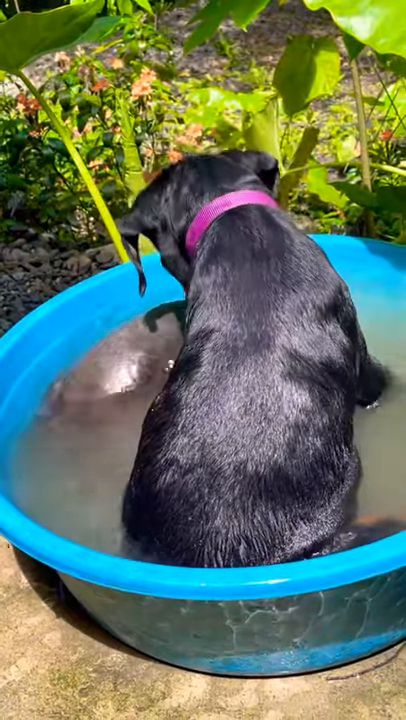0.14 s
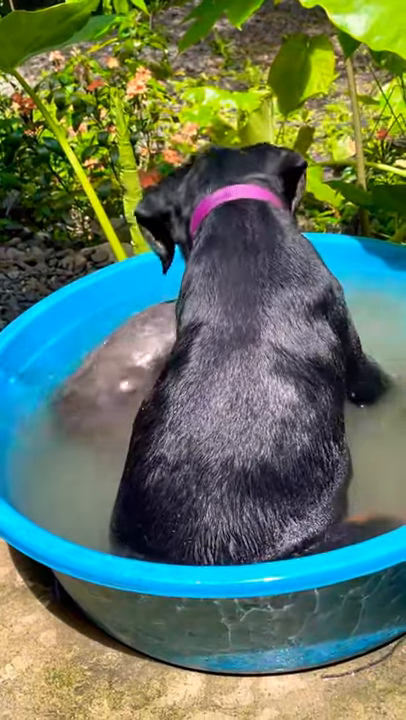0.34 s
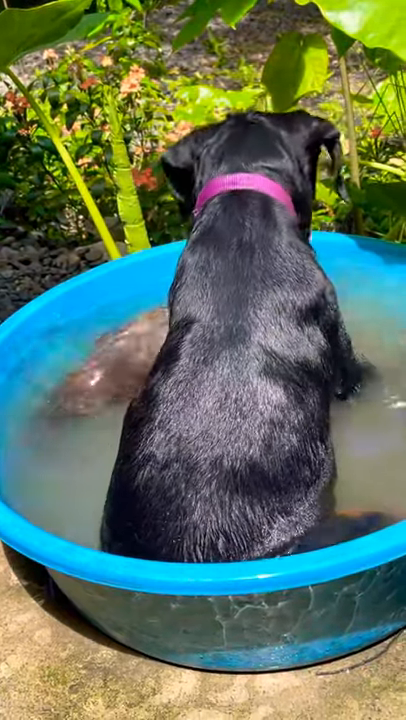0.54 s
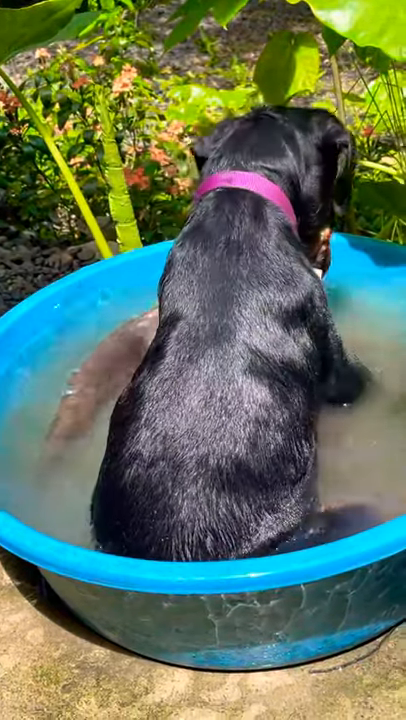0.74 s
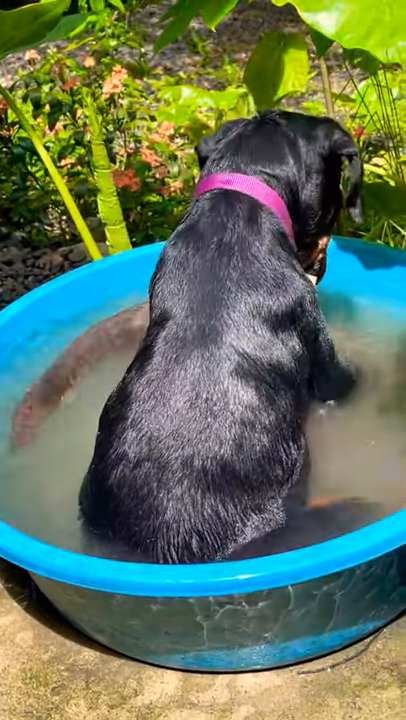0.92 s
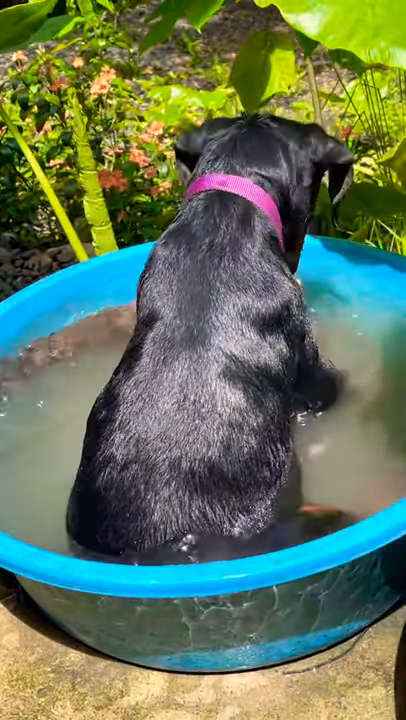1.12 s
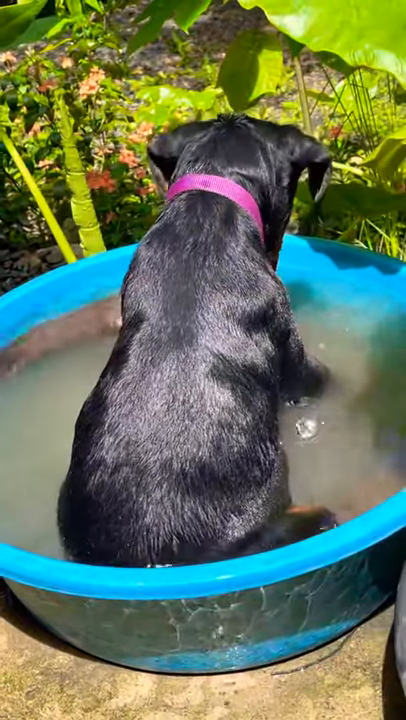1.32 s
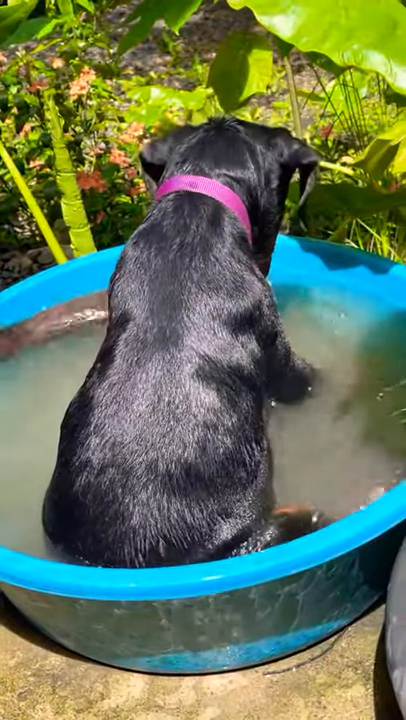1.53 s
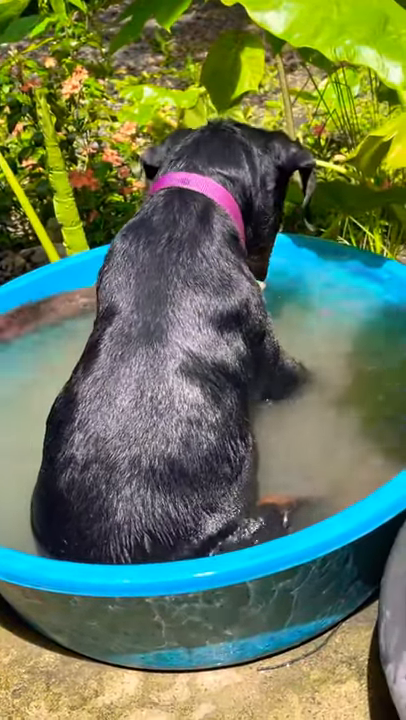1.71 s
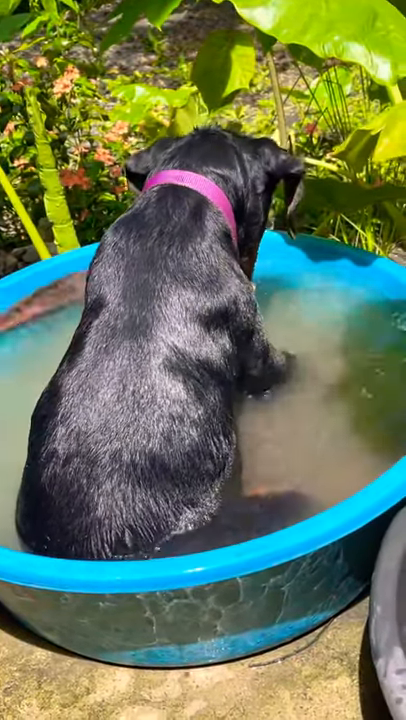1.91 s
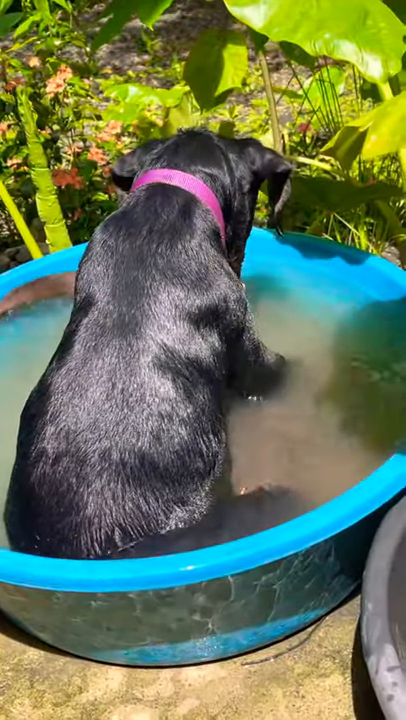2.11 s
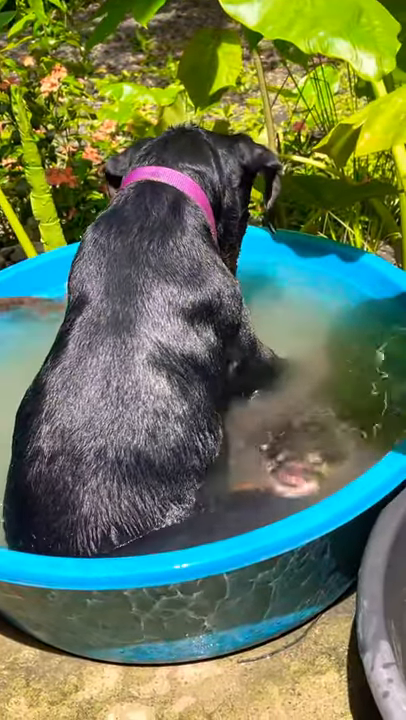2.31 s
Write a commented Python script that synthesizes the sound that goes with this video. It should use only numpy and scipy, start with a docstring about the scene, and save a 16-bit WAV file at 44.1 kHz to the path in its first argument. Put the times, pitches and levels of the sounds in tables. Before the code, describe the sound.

After a brief bright hiss and drops, an otter squeals loudly, pauses while water softly bubbles, then squeals again a little shorter; both cries drop in pitch and turn harsh, in a quiet garden, closely picked up in stereo.

```python
"""A bright hiss and a few drops open the scene and die away over a quiet outdoor hush.
At about 0.2 s an otter squeals from a plastic tub of water in a garden: a thin three-partial whistle
sags, then breaks to a lower, harsh register of many partials and rasp that slides down.
Water gurgles (gliding tones) and drips (short noise bursts); a breathy burst leads into a second squeal
at about 1.6 s. Tub and garden echo it all in part; two closely spaced microphones pick it up."""
import sys
import numpy as np
from scipy import signal
from scipy.fft import rfft, irfft
from scipy.io import wavfile

SR = 44100
rng = np.random.default_rng(int(sys.argv[2]) if len(sys.argv) > 2 else 0)


def waveform_to_disk(signal):
    """Save audio, clipped to [-1, 1], as 16-bit WAV at the path in sys.argv[1]."""
    frames = np.transpose(np.atleast_2d(signal))
    scaled = np.clip(frames, -1, 1) * 32767
    samples = np.round(scaled).astype(np.int16)
    wavfile.write(sys.argv[1], SR, samples)


N = 103635  # length in samples, about 2.35 s


def undb(db):
    """Turn decibels into a gain, where 20 dB is ten times the amplitude."""
    return 10 ** (np.asarray(db) / 20)


def unit(x):
    """Scale a sound to an rms (average strength) of 1."""
    return x / np.sqrt(np.mean(x ** 2) + 1e-30)


def lookup(table, hz):
    """Read a table between its rows, with frequency on a logarithmic axis as in hearing."""
    table_hz, values = np.array(table, float).T
    return np.interp(np.log(np.maximum(hz, 1)), np.log(np.sort(table_hz)), values)


def colour(x, table):
    """Make each frequency of a sound louder or softer by the table's decibels."""
    return irfft(rfft(x) * undb(lookup(table, np.fft.rfftfreq(N, 1 / SR))), N)


def noise(spectrum):
    """Random noise with the given balance of frequencies, rms 1."""
    return unit(colour(rng.standard_normal(N), spectrum))


def wander(hz):
    """Smooth random motion up to about this rate, centred on 0 with spread 1."""
    f = np.fft.rfftfreq(N, 1 / SR)
    keep_slow = np.exp(-.5 * (f / hz) ** 2) * (f > 0)
    return unit(irfft(rfft(rng.standard_normal(N)) * keep_slow, N))


def add(out, start_s, sound):
    """Mix a short sound into a longer one from the given time on."""
    i = int(np.clip(start_s * SR, 0, N - 1))
    out[i:i + len(sound)] += sound[:N - i]


# frequency balance of the outdoor hush: pitch_hz [Hz], level_db [dB per Hz, relative]
HUSH_SPECTRUM = [(25, -70), (42, -9), (58, -0.5), (85, -3.5), (130, -2.5), (220, -6.5), (350, -3.5),
                 (600, -11), (1000, -9), (1550, -5), (2100, -13), (3500, -12), (6200, -17), (7400, -12),
                 (8200, -19), (9400, -15.5), (10200, -5), (11300, -8), (12200, -30.5), (14000, -49)]
# slow rise and fall of the low part of the hush: time_s [s], level_db [dB]
LOW_HUSH_LEVEL = [(0, -1), (.35, -8.5), (.55, 5.5), (.9, -2.5), (1.25, 4), (1.6, -5), (1.95, 0),
                  (2.33, 6.5)]
HUSH_DB, LOW_HUSH_HZ = -60, 503  # level before the low part moves; where the low part ends


def hush(t):
    """Outdoor background: steady noise whose low part slowly swells and sinks."""
    air = undb(HUSH_DB) * noise(HUSH_SPECTRUM)
    low = signal.sosfiltfilt(signal.butter(2, LOW_HUSH_HZ, fs=SR, output="sos"), air)
    time_s, level_db = np.array(LOW_HUSH_LEVEL).T
    return air - low + low * undb(np.interp(t, time_s, level_db))


# share of the hush that differs between the microphones: pitch_hz [Hz], level_db [dB]
HUSH_DIFFERENCE = [(60, -24), (200, -17), (550, -3.5), (1000, -1), (1600, -22), (3000, -25), (11000, -22)]


def hush_difference(t):
    """A separate hush, added to one microphone and subtracted from the other, which widens it."""
    return colour(hush(t), HUSH_DIFFERENCE)


# colour of the garden echo: pitch_hz [Hz], level_db [dB]
GARDEN_COLOUR = [(500, 7), (1500, -11.5), (2050, 8), (2350, -1.5), (3400, -0.5), (4100, 2.5), (4800, 2.5),
                 (7000, 2.5), (9000, -5.5), (11200, 0), (12100, -28), (13000, -42)]
# time for the low and high noise to fall by 60 dB; level; middle of the fade-in
ECHO_T60_S, ECHO_TREBLE_T60_S, ECHO_DB, ECHO_START_S = 0.63, 0.43, -4.5, 0.0045


def garden(x, t):
    """Diffuse echo of walls and plants: a fading noise tail whose treble dies a little sooner."""
    low_filter = signal.butter(2, 5000, fs=SR, output="sos")
    high_filter = signal.butter(2, 5000, "high", fs=SR, output="sos")
    low = signal.sosfilt(low_filter, rng.standard_normal(N))
    high = signal.sosfilt(high_filter, rng.standard_normal(N))
    tail = low * np.exp(-np.log(1000) * t / ECHO_T60_S)
    tail = tail + high * np.exp(-np.log(1000) * t / ECHO_TREBLE_T60_S)
    tail = tail * np.clip(t / ECHO_START_S - .5, 0, 1)
    tail = colour(unit(tail) / np.sqrt(N), GARDEN_COLOUR)
    return undb(ECHO_DB) * signal.fftconvolve(x, tail[:N // 2])[:N]


TUB_DB, TUB_DECAY_S = -8, .007


def tub(x, t):
    """Quick reflections between the water and the tub wall: a very short noise echo."""
    early = rng.standard_normal(N) * np.exp(-t / TUB_DECAY_S)
    return x + undb(TUB_DB) * signal.fftconvolve(x, unit(early) / np.sqrt(N))[:N]


# turbulent rasp of the voice, also the opening hiss: pitch_hz [Hz], level_db [dB per Hz, relative]
RASP_SPECTRUM = [(1400, -46), (2100, -26), (2500, -8), (3500, -11), (5000, 2.5), (7000, -5), (9300, 1),
                 (11000, 6.5), (12000, -13), (13000, -67)]
OPENING_DB, OPENING_DECAY_S = -47.5, 0.033


def opening_hiss(t):
    """A bright noise that dies away at the start."""
    return undb(OPENING_DB) * np.exp(-t / OPENING_DECAY_S) * noise(RASP_SPECTRUM)


# drops and small splashes, and at 1.549 s the breathy onset of the second squeal:
# start_s [s], level_db [dB], centre_hz [Hz], width_octaves [octaves to each side], decay_s [s]
BURST_EVENTS = [(.003, -40.5, 3210, 0.16, 0.011), (.087, -44.5, 6100, 0.41, 0.0055),
                (.088, -37.5, 9630, 0.15, 0.0056), (.99, -31, 9590, 0.36, 0.0017),
                (1.181, -51.5, 5400, 0.14, .005), (1.497, -55.5, 6350, .4, .003),
                (1.549, -50, 4400, 0.8, 0.032), (1.558, -43.5, 2320, 0.082, 0.0091),
                (2.159, -44, 10300, 0.15, 0.0073), (2.222, -57, 7000, .3, 0.0056)]


def drops_and_breath(t):
    """Drops, small splashes and one breathy onset: short noise bursts, each kept to its own band."""
    out = np.zeros(N)
    for start_s, level_db, centre_hz, width_octaves, decay_s in BURST_EVENTS:
        edges = [centre_hz * 2 ** -width_octaves, centre_hz * 2 ** width_octaves]
        edges = np.clip(edges, 50, SR / 2 - 1000)
        band = signal.butter(3, edges, "bandpass", fs=SR, output="sos")
        burst = rng.standard_normal(N // 20) * np.exp(-t[:N // 20] / decay_s)
        # a narrow band keeps less noise, so it is raised to match
        width_gain = np.sqrt(SR / 2 / (edges[1] - edges[0]))
        add(out, start_s, undb(level_db) * signal.sosfilt(band, burst) * width_gain)
    return out


def bubble(length_s, start_hz, end_hz, level_db):
    """One ringing air pocket: a pure tone that swells, glides and fades."""
    u = np.linspace(0, 1, max(int(length_s * SR), 8))  # progress from 0 to 1
    shape = np.sin(np.pi * u ** 0.84)
    hz = start_hz * (end_hz / start_hz) ** u
    return undb(level_db) * shape * np.sin(2 * np.pi * np.cumsum(hz) / SR)


# gurgles, closing air pockets that mostly rise in pitch:
# start_s [s], length_s [s], start_hz [Hz], end_hz [Hz], level_db [dB]
GURGLE_EVENTS = [(0.327, 0.015, 1264, 1640, -55.5), (.376, .022, 1200, 1800, -60),
                 (0.839, 0.028, 554, 890, -65.5), (0.989, .025, 746, 725, -63.5),
                 (1.245, 0.016, 1250, 1080, -56.5), (1.297, 0.056, 515, 1270, -58),
                 (1.362, 0.037, 569, 920, -62), (1.538, 0.021, 1280, 2090, -56.5),
                 (1.563, 0.019, 1310, 1900, -57.5), (1.587, 0.027, 903, 1340, -64),
                 (1.675, 0.035, 434, 916, -60), (1.909, 0.04, 716, 1147, -50.5),
                 (1.947, 0.031, 1330, 2220, -52), (2.049, 0.028, 655, 830, -62)]
# faint bubbles: the quietest has BUBBLE_DB, and the spread lifts the others above it
BUBBLE_COUNT, BUBBLE_DB, BUBBLE_SPREAD_DB = 29, -75, 5
BUBBLE_LOW_HZ, BUBBLE_HIGH_HZ = 338, 2320  # range of starting pitches


def water():
    """Ringing air pockets: distinct gurgles over a random scatter of faint bubbles."""
    out = np.zeros(N)
    for start_s, length_s, start_hz, end_hz, level_db in GURGLE_EVENTS:
        add(out, start_s, bubble(length_s, start_hz, end_hz, level_db))
    for when, size, strength, rise in rng.random((BUBBLE_COUNT, 4)):
        hz = BUBBLE_LOW_HZ * (BUBBLE_HIGH_HZ / BUBBLE_LOW_HZ) ** size
        end_hz = hz * (1 + 0.36 * rise)
        level_db = BUBBLE_DB - BUBBLE_SPREAD_DB * np.log(1 - .95 * strength)
        add(out, when * N / SR, bubble(18 / hz, hz, end_hz, level_db))
    return out


ATTACK_S, RELEASE_S = 0.0038, 0.017
SHIMMER_DB, SHIMMER_HZ, PARTIAL_FLICKER_DB = 2, 62, 1.5  # trembling of the whole and of each partial
JITTER_HZ = 600  # how fast the pitch trembles


def gesture(rows, t):
    """Pitch in Hz and trembling loudness of one part of a squeal."""
    time_s, pitch_hz, level_db = np.array(rows, float).T
    fade_in = np.clip((t - time_s[0]) / ATTACK_S + .5, 0, 1)
    fade_out = np.clip((time_s[-1] - t) / RELEASE_S + .5, 0, 1)
    shimmer_db = SHIMMER_DB * wander(SHIMMER_HZ)
    loud = fade_in * fade_out * undb(np.interp(t, time_s, level_db) + shimmer_db)
    return np.interp(t, time_s, pitch_hz), loud


def jittered_phase(hz, jitter):
    """Vibration phase of a voice whose pitch trembles by this fraction."""
    return 2 * np.pi * np.cumsum(hz * (1 + jitter * wander(JITTER_HZ))) / SR


def partial(k, hz, phase, throat):
    """Partial k (k times the pitch), coloured by throat and mouth, with its own flicker."""
    level_db = lookup(throat, k * hz) + PARTIAL_FLICKER_DB * wander(SHIMMER_HZ)
    return undb(level_db) * np.sin(k * phase)


# whistle that opens each squeal, one list per squeal: time_s [s], pitch_hz [Hz], level_db [dB]
WHISTLE_PATHS = [
    [(.198, 4010, -40), (.224, 4185, -38), (.237, 4105, -25), (.27, 4104, -31), (.295, 3945, -32),
     (.32, 3780, -36), (.337, 3476, -35), (.352, 3490, -31.5), (.366, 2886, -37)],
    [(1.575, 3810, -52.5), (1.605, 4100, -33.5), (1.63, 4163, -29.5), (1.655, 4241, -24.5),
     (1.69, 4055, -35), (1.72, 3993, -32.5), (1.74, 3820, -39), (1.755, 3630, -29), (1.768, 3030, -28.5)],
]
# throat and mouth gain for the whistle: pitch_hz [Hz], level_db [dB]
WHISTLE_MOUTH = [(3000, 0), (4100, -0.5), (5900, -16), (6500, -7), (7000, -10.5), (7700, 5.5), (8400, 1.5),
                 (10000, -26), (11200, -1.5), (12000, -15), (12700, -33)]
# jitter (fraction of the pitch) and rasp grow with strain, which is 1 at the steady pitch
WHISTLE_DB, WHISTLE_RASP_DB, WHISTLE_JITTER = -0.5, -27, .002
WHISTLE_STEADY_HZ, WHISTLE_STRAIN_POWER = 3980, 10.3


def whistle(rows, t, count=3):
    """High, nearly pure register with three partials; it frays as the pitch sags."""
    hz, loud = gesture(rows, t)
    strain = (WHISTLE_STEADY_HZ / hz) ** WHISTLE_STRAIN_POWER
    phase = jittered_phase(hz, WHISTLE_JITTER * strain)
    tone = sum(partial(k, hz, phase, WHISTLE_MOUTH) for k in range(1, count + 1))
    rasp = undb(WHISTLE_RASP_DB) * strain * noise(RASP_SPECTRUM)
    return undb(WHISTLE_DB) * loud * (tone + rasp)


# harsh lower register after each whistle, one list per squeal: time_s [s], pitch_hz [Hz], level_db [dB]
SQUALL_PATHS = [
    [(.362, 1856, -27), (.4, 1813, -33), (.435, 1756, -26.5), (.475, 1688, -34), (.492, 1623, -29),
     (.55, 1525, -31.5), (.585, 1417, -32.5), (.603, 1366, -28), (.622, 1288, -37), (.68, 1202, -35),
     (.73, 1147, -36.5), (.78, 1077, -57.5), (.802, 922, -88)],
    [(1.763, 1872, -27.5), (1.795, 1789, -30), (1.83, 1683, -29.5), (1.855, 1542, -29.5),
     (1.885, 1378, -33), (1.92, 1244, -38), (1.96, 1208, -37), (1.995, 1175, -44.5), (2.015, 957, -56)],
]
# throat and mouth gain for the lower register: pitch_hz [Hz], level_db [dB]
SQUALL_MOUTH = [(900, 18.5), (1150, -2.5), (1400, 3.5), (1770, -2), (1880, 4), (2080, -21), (2300, -2.5),
                (2800, 4), (3600, -0.5), (4400, -6), (5400, -4), (6000, -8), (7100, -1.5), (8300, -4.5),
                (9600, -11.5), (10900, -0.5), (11700, -20), (12600, -43), (13100, -71)]
# jitter (fraction of the pitch) and rasp grow with roughness, which is 1 at the reference pitch
SQUALL_DB, SQUALL_RASP_DB, SQUALL_JITTER = -2.5, -21, .009
ROUGH_REF_HZ, ROUGH_POWER = 1343, 1.23  # the voice gets rougher as its pitch falls
# the soft, pure fundamental (partial 1) grows more slowly than the overtones
FUNDAMENTAL_DB, FUNDAMENTAL_GROWTH = -31, 0.46
# share of its strength at the break, and the time by which it is full
FUNDAMENTAL_START, FUNDAMENTAL_RISE_S = .35, .075


def squall(rows, t, count=12):
    """Lower register: a pure fundamental swells in under jittery overtones and a growing rasp."""
    hz, loud = gesture(rows, t)
    rough = (ROUGH_REF_HZ / hz) ** ROUGH_POWER
    phase = jittered_phase(hz, SQUALL_JITTER * rough)
    top_hz = SQUALL_MOUTH[-1][0]  # no overtones from here up
    overtones = sum(partial(k, hz, phase, SQUALL_MOUTH) * (k * hz < top_hz) for k in range(2, count + 1))
    rasp = noise(RASP_SPECTRUM) * rough * undb(SQUALL_RASP_DB)
    # holds its starting share for half the rise time, then swells to full
    still_to_rise = np.clip(2 - 2 * (t - rows[0][0]) / FUNDAMENTAL_RISE_S, 0, 1)
    swell = FUNDAMENTAL_START ** still_to_rise
    strength = undb(FUNDAMENTAL_DB + lookup(SQUALL_MOUTH, hz)) * swell * loud ** FUNDAMENTAL_GROWTH
    return undb(SQUALL_DB) * loud * (overtones + rasp) + strength * np.sin(phase)


BURST_SEND_DB, ECHO_SIDE_DB = -6, -14  # bursts and gurgles into the garden; echo that differs by microphone


def scene():
    """Squeals, water and hush, with their echoes, at the two microphones."""
    t = np.arange(N) / SR
    voice = sum(whistle(rows, t) for rows in WHISTLE_PATHS)
    voice = voice + sum(squall(rows, t) for rows in SQUALL_PATHS)
    gurgle, bursts = water(), drops_and_breath(t)
    send = voice + undb(BURST_SEND_DB) * (bursts + gurgle)
    shared = tub(voice, t) + gurgle + bursts + garden(send, t) + opening_hiss(t) + hush(t)
    difference = undb(ECHO_SIDE_DB) * garden(send, t) + hush_difference(t)
    return np.array([shared + difference, shared - difference])


# phase by which the left microphone leads: pitch_hz [Hz], lead_rad [radians]
MICROPHONE_LEAD = [(20, 0), (250, -.1), (600, -.45), (1100, 0), (2000, .05), (2600, .65), (4000, .7),
                   (4500, 1.5), (4900, 3.1), (5300, 5.5), (5700, 6.2), (6200, 6.35), (7200, 7.7),
                   (8200, 8.8), (8800, 9.35), (9500, 9.45), (10000, 10.1), (11000, 11.2), (12200, 12.4)]
TOP_HZ = 15100  # upper limit of the sound


def record(dry):
    """The two microphones differ in phase, half the lead each way; everything above TOP_HZ is removed."""
    size = 2 * N  # silence after the end keeps the phase shift from wrapping round
    lead = lookup(MICROPHONE_LEAD, np.fft.rfftfreq(size, 1 / SR))
    shift = np.exp(.5j * np.array([lead, -lead]))
    both = irfft(rfft(dry, size) * shift, size)[:, :N]
    return signal.sosfilt(signal.ellip(8, .2, 70, TOP_HZ, fs=SR, output="sos"), both)


dry = scene()
out = record(dry)
waveform_to_disk(out)
```